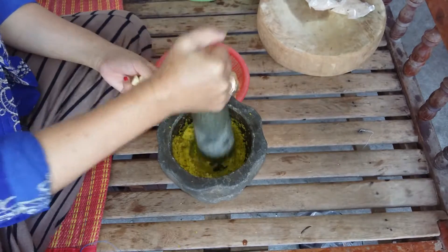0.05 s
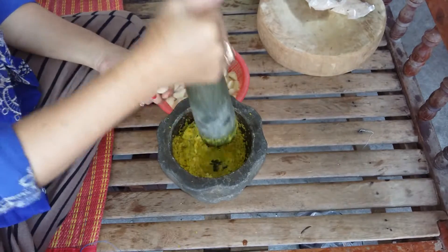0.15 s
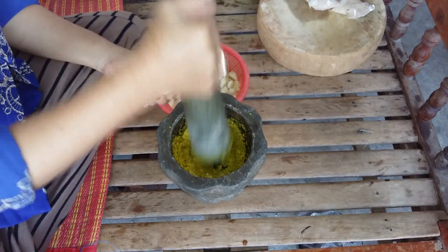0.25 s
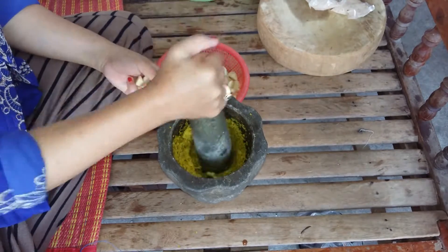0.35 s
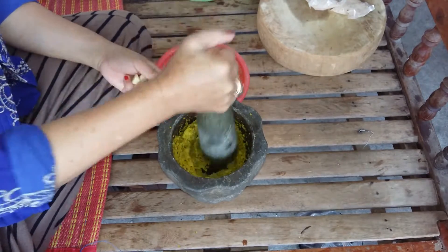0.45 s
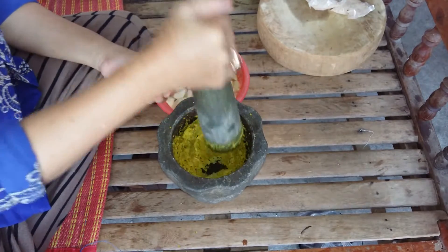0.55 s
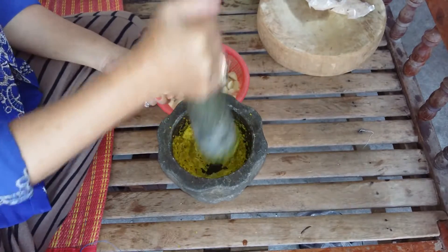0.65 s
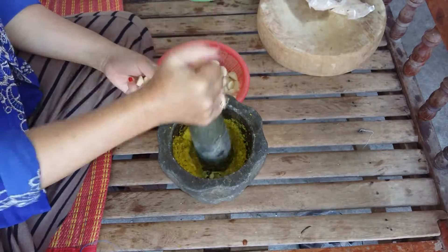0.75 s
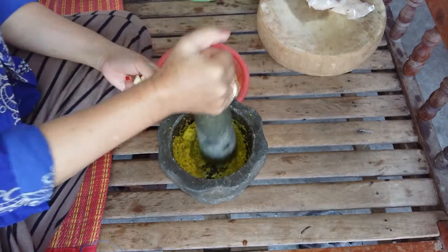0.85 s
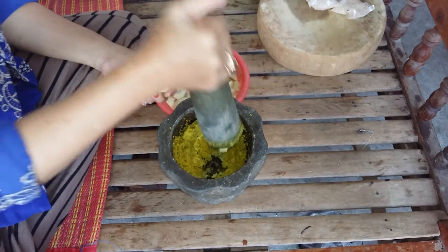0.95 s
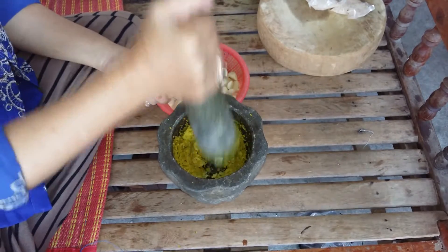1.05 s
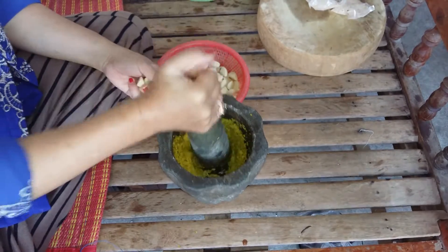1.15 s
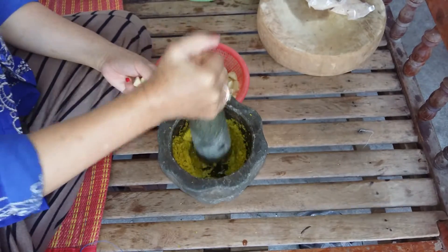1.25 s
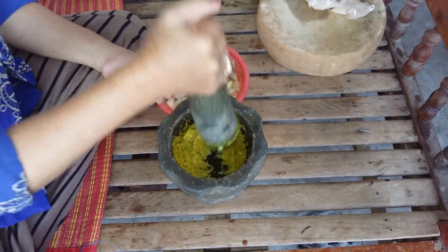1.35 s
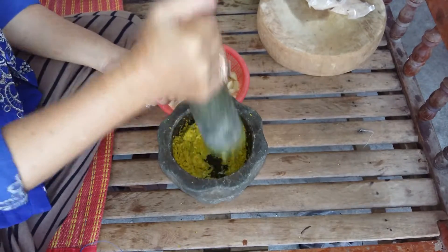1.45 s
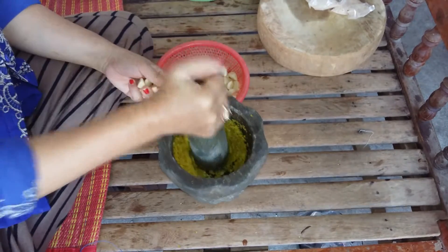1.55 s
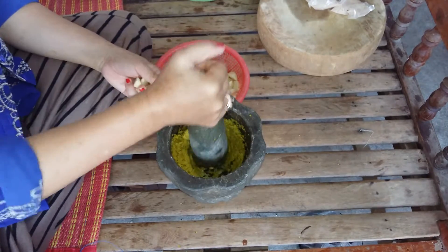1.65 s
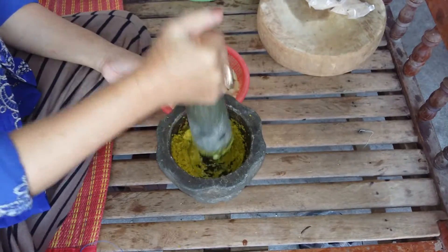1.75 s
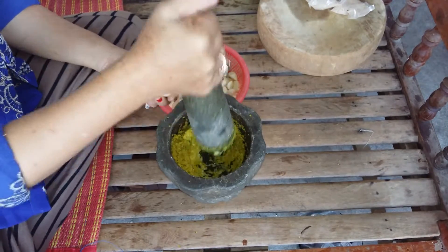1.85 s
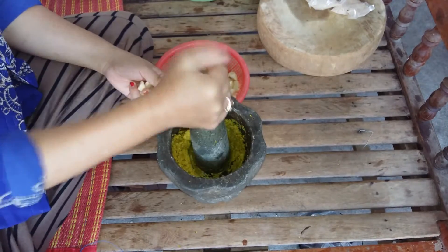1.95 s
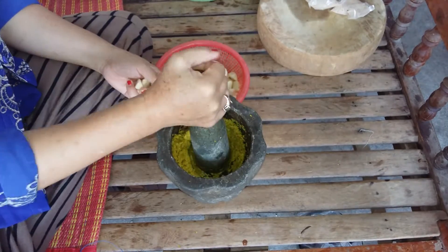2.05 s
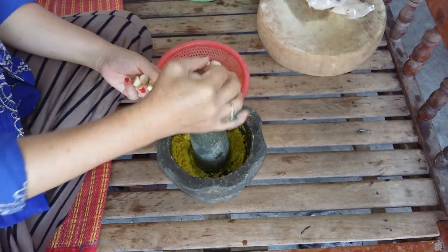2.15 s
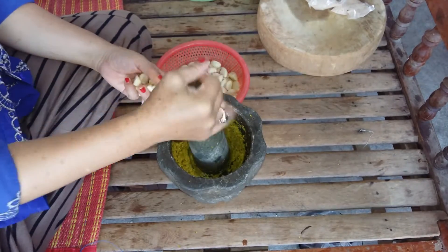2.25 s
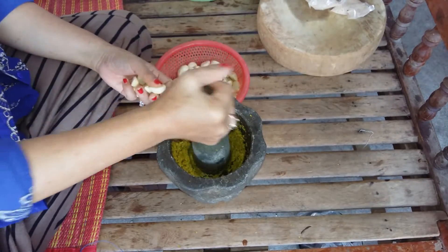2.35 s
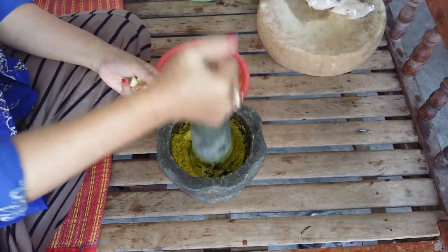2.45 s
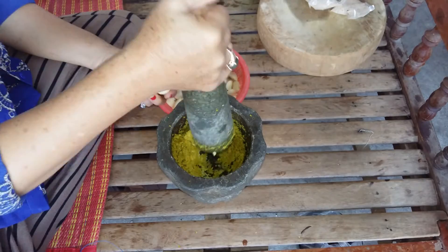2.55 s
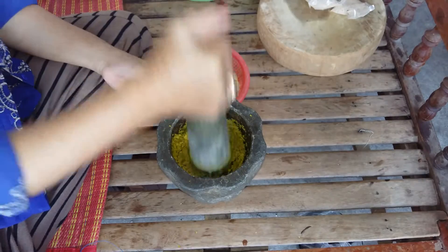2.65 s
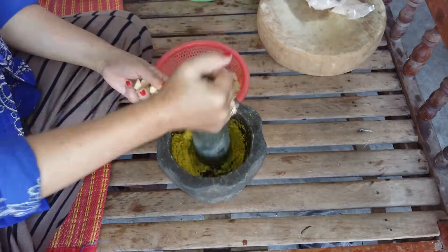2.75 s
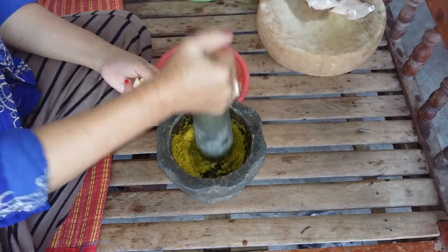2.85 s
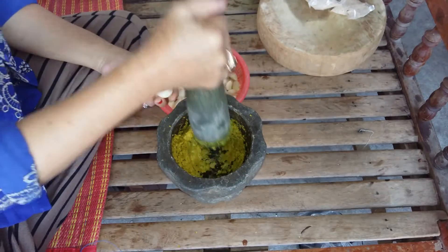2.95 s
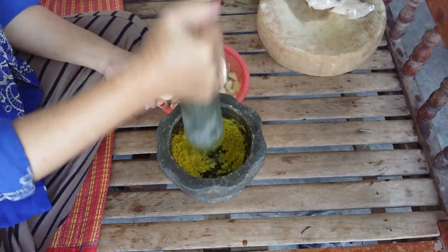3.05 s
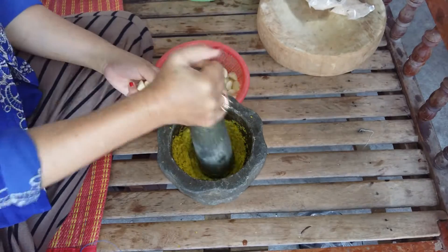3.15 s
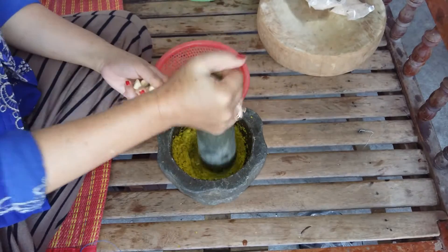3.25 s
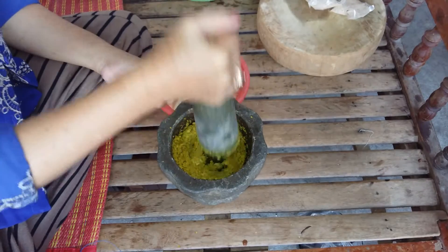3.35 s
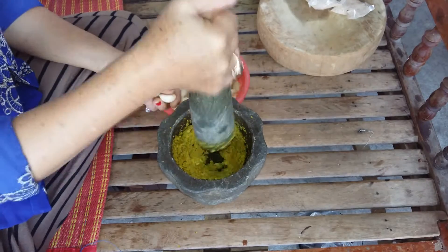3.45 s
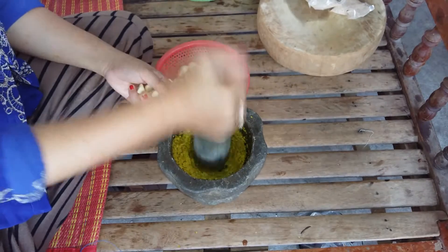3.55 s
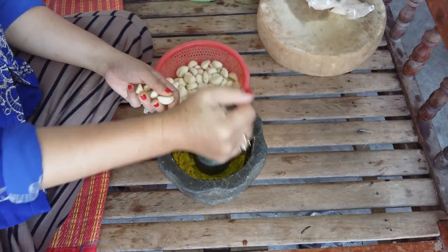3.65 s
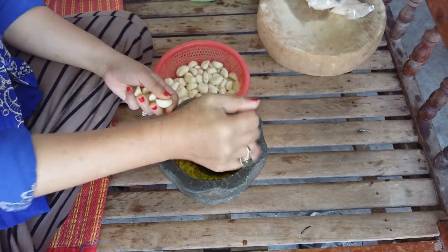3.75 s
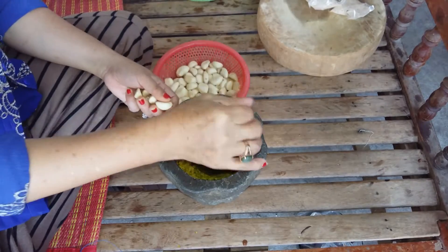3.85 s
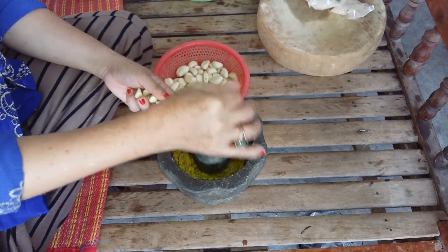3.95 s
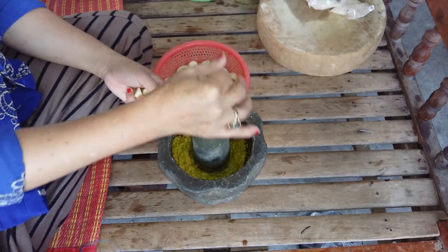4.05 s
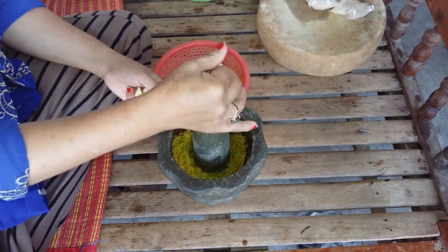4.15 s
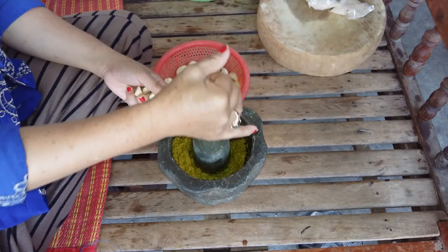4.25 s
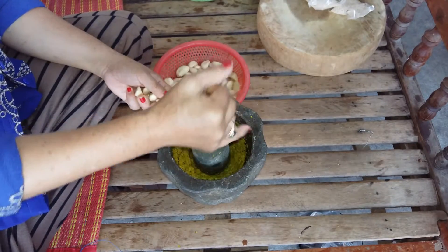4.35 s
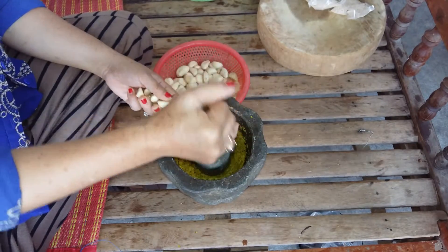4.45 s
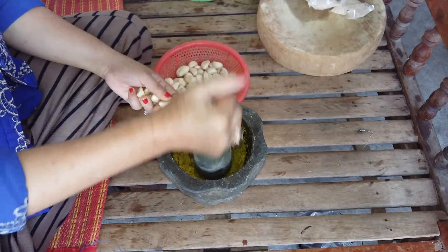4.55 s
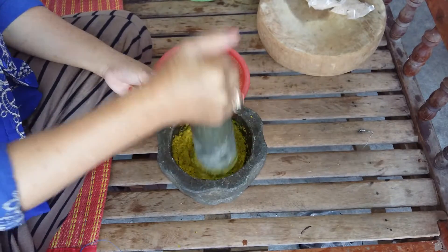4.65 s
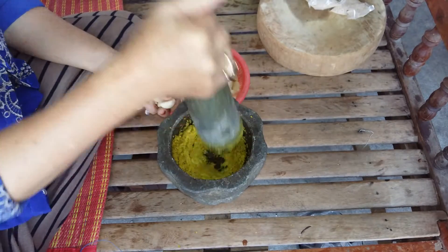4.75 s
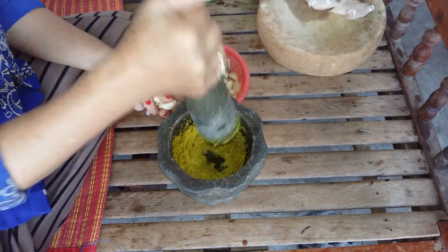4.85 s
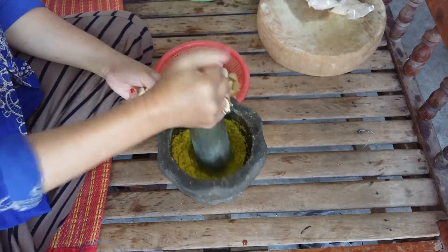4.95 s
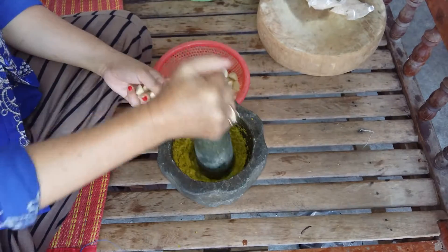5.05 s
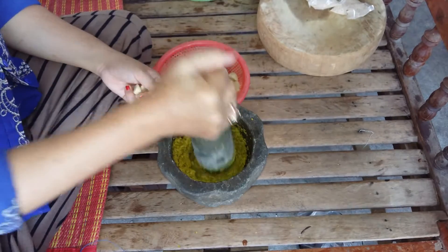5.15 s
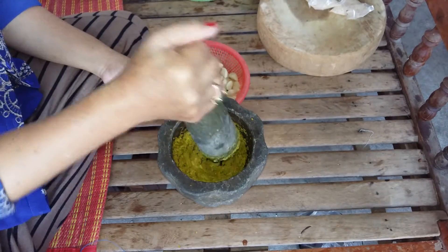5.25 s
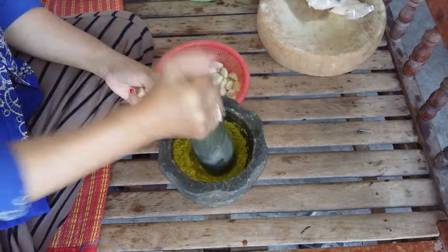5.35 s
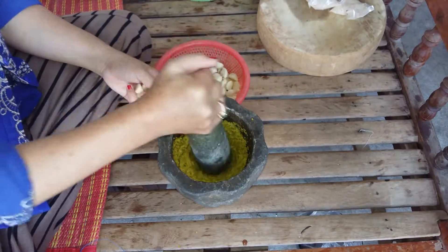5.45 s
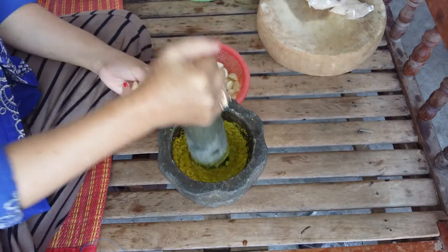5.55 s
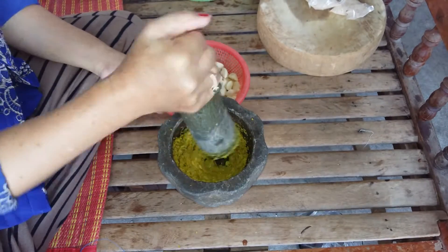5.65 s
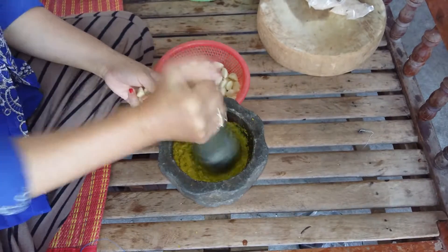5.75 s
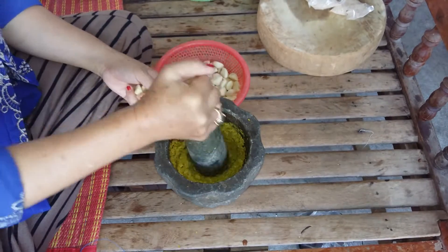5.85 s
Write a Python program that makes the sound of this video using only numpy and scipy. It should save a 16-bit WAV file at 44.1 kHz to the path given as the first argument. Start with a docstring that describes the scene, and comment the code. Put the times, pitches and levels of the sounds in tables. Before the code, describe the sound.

A loud stone crack opens, followed by softer wet paste strokes and dull, fading knocks as the mortar rocks on wooden slats. Two ringing bounces come next, then a heavy blow. After a quieter gap with faint squishes and rubs, another hard blow lands, then a pause, a light stroke and a final loud crack. Close stereo microphones, slightly right, with short hard-wall echoes.

```python
"""A stone pestle pounds wet spice paste in a stone mortar on a slatted wooden table.
A low noise rumble swells with the pounding and sinks in the pauses. A stone crack (damped modes, noise burst,
echoes) opens; a cushioned stroke (wet grains, thud) follows at 0.37 s, and from 0.56 s the mortar rocks on the
slats after strokes. The pestle rings free at 1.19 and 1.59 s. Short noise-band rasps start at 2.6 s; rubbing
drags come at 3.25 and 5.2 s, between more strokes. A thin far tone peaks at 4.95 s. The hard walls answer
with noise under echo envelopes."""
import sys
import numpy as np
from scipy import signal
from scipy.fft import rfft, irfft, next_fast_len
from scipy.io import wavfile

SR = 44100
rng = np.random.default_rng(int(sys.argv[2]) if len(sys.argv) > 2 else 0)


def generate_wav(sig):
    """Save sig (samples, or channels by samples) to the path in sys.argv[1] as 16-bit PCM at SR."""
    pcm = np.round(np.clip(np.atleast_2d(sig).T, -1, 1) * 32767).astype(np.int16)
    wavfile.write(sys.argv[1], SR, pcm)


N = 260631
T = np.arange(SR * 3 // 5) / SR  # time base of one event, s


def amp(db):
    """Decibels to gain."""
    return 10 ** (np.asarray(db) / 20)


def unit(x):
    """Scale to rms 1."""
    return x / np.sqrt(np.mean(x ** 2) + 1e-20)


def along(points, hz):
    """Interpolate (f/Hz, value) points on a log frequency axis."""
    f, v = np.transpose(points)
    return np.interp(np.log(hz + 1), np.log(f), v)


def fade(t60_s):
    """Exponential decay, 60 dB in t60_s."""
    return np.exp(-np.log(1000) * T / t60_s)


def rise(attack_s):
    """Soft start."""
    return 1 - np.exp(-(T / attack_s) ** 2)


def add(track, s, sound):
    """Mix a sound in at time s."""
    start = round(s * SR)
    lo, hi = max(start, 0), min(start + sound.shape[1], N)
    if hi > lo:
        track[:, lo:hi] += sound[:, lo - start:hi - start]


# left-right likeness of noise: f/Hz, correlation
ALIKE = [(110, 0.98), (170, 1), (300, 0.84), (600, 0.73), (1000, .5), (1600, 0.002), (3000, 0.11),
         (10000, 0)]


def noise(spectrum, size=len(T), tilt_db=0, grain_db=0):
    """Coloured stereo noise of rms 1; tilt_db is per octave, grain_db breaks it into millisecond grains."""
    hz = np.fft.rfftfreq(size, 1 / SR)
    grain_levels_db = grain_db * rng.standard_normal(size // 44 + 1)
    grains = np.repeat(amp(grain_levels_db), 44)[:size]
    octaves = np.log2(np.clip(hz, 150, 6000) / 1000)
    # reflections from the hand and bowl comb each sound differently
    ripple_db = 1.8 * np.interp(hz, np.arange(256) * 90, rng.standard_normal(256))
    ripple_db *= np.minimum(hz / 800, 1)
    turn = np.arccos(np.clip(along(ALIKE, hz), -1, 1)) / 2  # mid-side angle
    gain = amp(along(spectrum, hz) + tilt_db * octaves + ripple_db)
    source = rng.standard_normal((2, size)) * grains
    mid, side = irfft(rfft(source) * gain * [np.cos(turn), np.sin(turn)], size)
    return unit(np.array([mid + side, mid - side]))


def direct(x, width=.55):
    """Sound straight from the bowl is more alike at the two microphones than its echoes."""
    mid = x.mean(axis=0)
    return unit(mid + width * (x - mid))


def ring(modes, spread_hz=3300):
    """Modes start together with alternating sign; higher ones reach the two microphones out of phase."""
    out = np.zeros((2, len(T)))
    for k, (hz, db, t60_s) in enumerate(modes):
        t = T[T < 2 * t60_s]
        lead = min(hz / spread_hz, 1) * np.array([[1], [-1]]) * np.pi / 4
        decay = amp(db + .5 * rng.normal() - 60 * t / t60_s)
        out[:, :len(t)] += (-1) ** k * decay * np.sin(2 * np.pi * hz * t + lead)
    return out * rise(0.00039)


def walls(hold_s=0.06, early_t60_s=0.32, late_db=-19, late_t60_s=0.81):
    """Envelope of the echoes: they build up, hold briefly, drop fast, then linger."""
    early = np.exp(-np.log(1000) * (np.hypot(T, hold_s) - hold_s) / early_t60_s)
    return rise(0.0075) * np.hypot(early, amp(late_db) * fade(late_t60_s))


# stone on stone: t/s, level/dB, centre of excited modes f/Hz, crack over that level/dB
STRIKES = [(-.012, -1, 1000, -1.5), (0.3872, -25.5, 2400, -1), (0.4299, -22.5, 1910, -7.5),
           (0.4807, -38, 1920, -22), (0.8383, -25, 1810, -1), (.846, -25.5, 1900, -3.5),
           (1.1864, -10, 1670, -9), (1.195, -14, 1700, 5), (1.5898, -10.5, 2150, -7.5),
           (2.0211, -6.5, 925, -5), (2.88, -36, 2020, -2.5), (3.431, -49.5, 1200, -6),
           (3.6704, -2.5, 910, -5), (3.687, -13.5, 990, -0.5), (5.0841, -17.5, 1780, -9),
           (5.091, -21, 1680, -9.5), (5.4645, -2, 1180, -3), (5.4686, -11, 890, -2.5)]
# mortar and pestle modes: f/Hz, level/dB, t60/s
STONE_MODES = [(262, -3, 0.034), (348, -5.5, 0.033), (594.5, -10.5, 0.049), (885, -1, 0.032),
               (1077.6, -6, 0.022), (1310, -6.5, 0.018), (1590, -4, .03), (1730, -5, 0.025),
               (1903, -4.5, 0.022), (2230, -5.5, 0.026), (2700, -6.5, .025), (3220, -8.5, 0.028),
               (4920, -9, 0.035), (5620, -4, 0.073)]
# spectra: f/Hz, relative density/dB per Hz
CRACK_SPECTRUM = [(30, -26.5), (150, -13.5), (500, -4.5), (1000, 3.5), (2500, -2), (4000, -6), (6200, -7.5),
                  (7500, -25), (10000, -37.5), (16000, -51.5)]
THUMP_SPECTRUM = [(30, -20), (60, -12.5), (110, 1.5), (180, 0.5), (260, -3.5), (340, -3.5), (500, -12),
                  (900, -26), (3000, -60.5)]
ECHO_SPECTRUM = [(30, -43.5), (70, -21.5), (150, -8.5), (320, -4.5), (520, -7), (950, -1.5), (1250, -8.5),
                 (2000, -3.5), (2600, -5.5), (3900, -9.5), (5200, -9.5), (6200, -6.5), (7400, -25),
                 (10000, -42), (16000, -61)]
ECHO_DB, THUMP_DB = -13.5, -26.5  # re strike level
ECHO_TILT_DB_PER_OCT, TILT_PER_CRACK_DB = 0.44, 0.3572  # a sharper crack brightens the echo


def strikes():
    """Stone meets stone: crack, damped modes favoured near a centre, thump through the table, wall echoes."""
    out = np.zeros((2, N))
    snap = rise(0.0011) * fade(.028)
    push = rise(0.03) * fade(0.26)
    answer = walls()
    for s, db, centre_hz, crack_db in STRIKES:
        modes = [(hz, level_db - 6.0 * abs(np.log2(hz / centre_hz)), t60_s)
                 for hz, level_db, t60_s in STONE_MODES]
        body = ring(modes)
        crack = snap * direct(noise(CRACK_SPECTRUM))
        thump = push * noise(THUMP_SPECTRUM)
        tilt_db = ECHO_TILT_DB_PER_OCT + TILT_PER_CRACK_DB * crack_db
        echo = answer * noise(ECHO_SPECTRUM, tilt_db=tilt_db, grain_db=2)
        sound = body + amp(crack_db) * crack + amp(THUMP_DB) * thump + amp(ECHO_DB) * echo
        add(out, s, amp(db) * sound)
    return out


# strokes cushioned by paste: t/s, squish level/dB, thud level/dB, thud tilt/dB per octave
SOFT_STROKES = [(0.3721, -20.5, -30, 0), (0.7832, -21, -26, -.5), (1.264, -42, -35, 2.5),
                (2.797, -36.5, -39, -1), (3.2043, -36, -49.5, 0), (5.0437, -27.5, -32, -.5),
                (5.8549, -29.5, -35.5, -1)]
# paste smacks as the pestle shifts: t/s, level/dB
SPATTERS = [(1.6881, -28), (2.3161, -45.5)]
# spectra: f/Hz, relative density/dB per Hz
THUD_SPECTRUM = [(30, -27), (80, -9.5), (160, 0.5), (320, 2), (600, -1), (1100, -8.5), (1600, -5.5),
                 (2400, -5), (3600, -15), (6200, -17.5), (7500, -41), (16000, -55.5)]
SQUISH_SPECTRUM = [(100, -29), (800, -11.5), (2300, -8), (4000, -9), (5200, -2), (6050, 5.5), (6700, -8.5),
                   (7500, -15.5), (10000, -31.5), (16000, -46)]
PACK_S = .009  # from touching the paste to the thud
SINK_S, SINK_DB = .05, -11.5  # weaker squish as the pestle reaches the bottom


def paste():
    """A cushioned stroke spits wet grains first, thuds as the paste packs, and spits again at the bottom."""
    out = np.zeros((2, N))
    spit = np.hypot(amp(-4.5) * rise(0.0007) * fade(0.072), amp(-20) * walls())
    pack = np.hypot(amp(1.5) * rise(0.0036) * fade(0.14), amp(0.5) * walls())
    squishes = list(SPATTERS)
    for s, squish_db, thud_db, tilt_db in SOFT_STROKES:
        thud = pack * noise(THUD_SPECTRUM, tilt_db=tilt_db, grain_db=3)
        add(out, s + PACK_S, amp(thud_db) * thud)
        squishes += [(s, squish_db), (s + SINK_S, squish_db + SINK_DB)]
    for s, db in squishes:
        add(out, s, amp(db) * spit * noise(SQUISH_SPECTRUM, grain_db=3))
    return out


# pestle bouncing free: t/s, level/dB
BOUNCES = [(1.1892, -25), (1.5926, -6.5)]
# pestle modes: f/Hz, level/dB, t60/s
PESTLE_MODES = [(3010, 5, 0.059), (3020, -19, 0.45), (2940, -16.5, 0.44), (2920, -19, .42),
                (2880, -23, 0.36)]


def pestle():
    """The bouncing pestle's bending note, and the same note scattered by the walls."""
    out = np.zeros((2, N))
    note = [(2000, -60), (2850, -20), (3020, 0), (3150, -18), (4200, -60), (8000, -120)]  # f/Hz, dB per Hz
    for s, db in BOUNCES:
        echo = walls(hold_s=0.14, early_t60_s=0.16, late_db=-23.0, late_t60_s=1.)
        scattered = noise(note) * echo
        add(out, s, amp(db) * (ring(PESTLE_MODES) + amp(-11.5) * scattered))
    return out


# pestle dragged through paste: t/s, length/s, rub level/dB, wet fizz level/dB
GRINDS = [(3.247, .41, -52.5, -71), (5.2, .25, -44, -58)]
# f/Hz, relative density/dB per Hz
RUB_SPECTRUM = [(30, -44), (70, -2.5), (110, 1.5), (200, -6.5), (340, -7), (470, -10.5), (700, -13),
                (1100, -17), (2500, -27), (5000, -34), (8000, -58)]
GRIND_EASES_DB_PER_S = 7  # the hand lets up along a drag


def grinding():
    """Between blows the pestle rubs low in the bowl while the paste fizzes."""
    out = np.zeros((2, N))
    for s, length_s, rub_db, fizz_db in GRINDS:
        release = np.clip((length_s - T) / .006, 0, 1)
        pressure = rise(0.0088) * amp(-GRIND_EASES_DB_PER_S * T) * release
        rub = noise(RUB_SPECTRUM, grain_db=3)
        fizz = noise(SQUISH_SPECTRUM, grain_db=3)
        add(out, s, pressure * (amp(rub_db) * rub + amp(fizz_db) * fizz))
    return out


# mortar rocking after a stroke: first knock t/s, level/dB, loss/dB per knock
ROCKINGS = [(.564, -32, 5.5), (.905, -30.5, 2.5), (1.315, -25, 3.5), (1.75, -28.5, 6.5), (2.19, -43, 2.5),
            (2.991, -40, 5), (3.391, -42.5, 0.5), (5.25, -46, 0.5)]
# dull clack: f/Hz, relative density/dB per Hz
SLAT_SPECTRUM = [(30, -38.5), (100, -7), (230, -12), (320, -1.5), (450, -11.5), (580, -7.5), (1100, -16),
                 (2500, -25.5), (7000, -62)]
ROCK_PERIOD_S = .069
SLAT_DB, TABLE_HUM_DB = -7, -8  # clack and ring of a knock


def table(count=4):
    """The slats knock dully at an even pace, ever weaker, as the heavy mortar rocks on them."""
    out = np.zeros((2, N))
    knock, swell = rise(0.018) * fade(0.22), rise(.009)
    modes = [(288.7, -3.0, 0.18), (370, -8.5, 0.099), (580, -7.0, .1)]  # f/Hz, level/dB, t60/s
    for s, db, loss_db in ROCKINGS:
        for k in range(count):
            hum = swell * ring(modes)
            sound = amp(SLAT_DB) * knock * noise(SLAT_SPECTRUM) + amp(TABLE_HUM_DB) * hum
            add(out, s + k * ROCK_PERIOD_S, amp(db - k * loss_db) * sound)
    return out


# short high rasps: t/s, length/s, f/Hz, level/dB
RASPS = [(2.616, 0.1, 4110, -79.5), (3.19, 0.05, 5970, -50), (3.42, 0.17, 4500, -68.5),
         (4.902, 0.15, 4400, -76), (5.391, 0.077, 5800, -55.5)]


def rasps():
    """Narrow noise bands that swell and fade."""
    out = np.zeros((2, N))
    for s, length_s, hz, db in RASPS:
        band = [(hz * .7, -35), (hz * .92, -10), (hz, 0), (hz * 1.08, -10), (hz * 1.3, -40)]
        swell = np.sin(np.pi * np.minimum(T / length_s, 1))
        add(out, s, amp(db) * noise(band) * swell)
    return out


# low rumble: f/Hz, relative density/dB per Hz
RUMBLE_SPECTRUM = [(25, -44.5), (45, -20), (75, -2.5), (110, -4.5), (170, -4.5), (250, -14), (480, -17.5),
                   (700, -19), (1100, -28.5), (1500, -34.5), (3300, -38), (6000, -34.5), (7600, -55.5),
                   (15000, -60)]
# low rumble, up with the pounding and down in the pauses: t/s, level/dB
RUMBLE_LEVEL = [(0, -51), (1.9, -56), (2.5, -63), (3.3, -58.5), (4.3, -62), (4.8, -64.5), (5.05, -56),
                (5.9, -61)]


def rumble():
    """Low noise that swells with the pounding and sinks in the pauses, its level read from a table."""
    t = np.arange(N) / SR
    level_db = np.interp(t, *np.transpose(RUMBLE_LEVEL))
    return amp(level_db) * noise(RUMBLE_SPECTRUM, next_fast_len(N))[:, :N]


WHINE_PEAK_S, WHINE_DB, WHINE_SLOPE_DB_PER_S = 4.95, -83, 17.5


def whine():
    """A thin far tone of narrow noise that swells and fades."""
    t = np.arange(N) / SR
    thin = [(1500, -60), (1690, -15), (1730, 0), (1770, -15), (2000, -60)]  # f/Hz, dB per Hz
    level_db = WHINE_DB - WHINE_SLOPE_DB_PER_S * abs(t - WHINE_PEAK_S)
    return amp(level_db) * noise(thin, next_fast_len(N))[:, :N]


# resonances of the table and the space around it: f/Hz, width/Hz, lift (or cut)/dB
STANDING = [(96, 12, 2), (226.9, 7.6, 5), (321, 18, 6), (379.4, 5.3, 8), (552, 22, 5), (724, 16, 3.5),
            (895, 17, 2), (1070, 8.6, 6), (1164, 15, 3.5), (1290, 31, 5), (1440, 58, 4), (1495, 25, 5.5),
            (1877, 13, 4.5), (2690, 30, -3)]


def resonate(x):
    """Parallel resonators: the table and the space around it ring on at their own pitches."""
    out = x.copy()
    for hz, width_hz, db in STANDING:
        b, a = signal.iirpeak(hz, hz / width_hz, SR)
        out += (amp(db) - 1) * signal.lfilter(b, a, x)
    return out


def scene():
    """All sources, resonated; everything stands slightly to the right."""
    sounds = strikes() + paste() + pestle() + grinding() + table() + rasps() + rumble() + whine()
    return resonate(sounds) * amp([[-.4], [.4]])


TOP_HZ = 15800


def record(dry):
    """The hardest peaks are rounded off; nothing from TOP_HZ up is kept."""
    rounded = dry / (1 + np.abs(dry / .97) ** 8) ** (1 / 8)
    size = next_fast_len(N + SR // 2)
    keep = np.fft.rfftfreq(size, 1 / SR) < TOP_HZ
    return irfft(rfft(rounded, size) * keep, size)[:, :N]


dry = scene()
out = record(dry)
generate_wav(out)
```